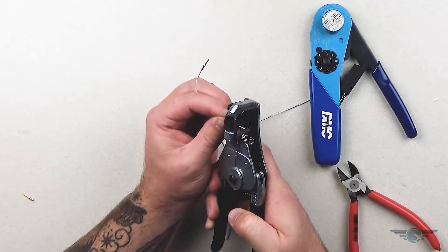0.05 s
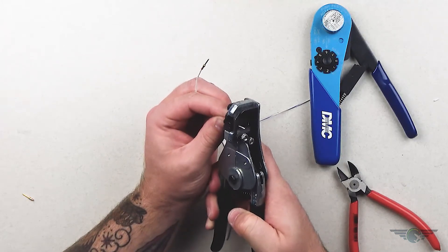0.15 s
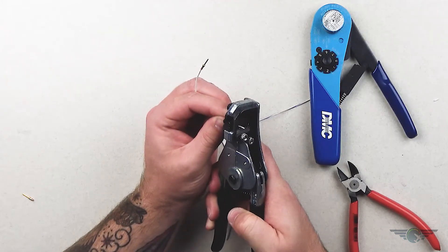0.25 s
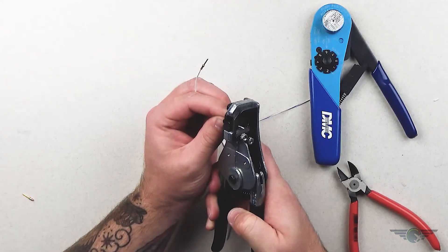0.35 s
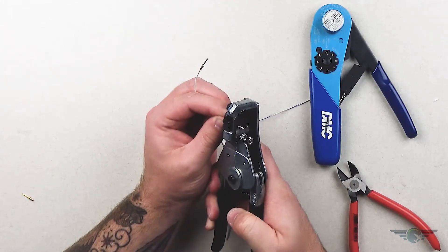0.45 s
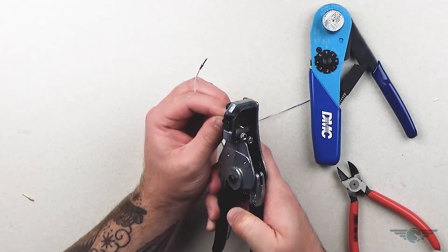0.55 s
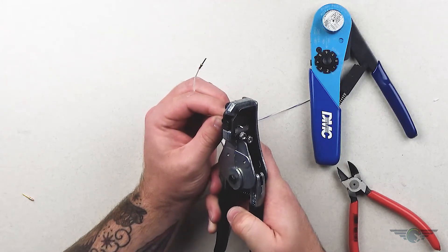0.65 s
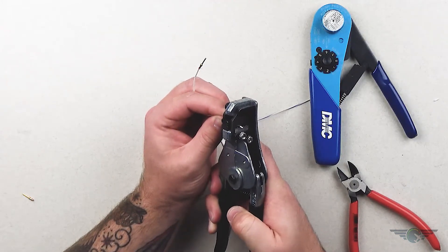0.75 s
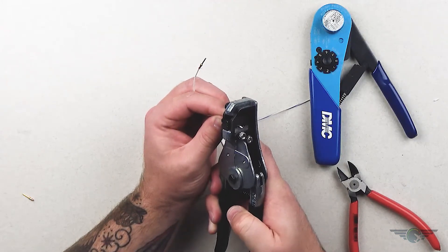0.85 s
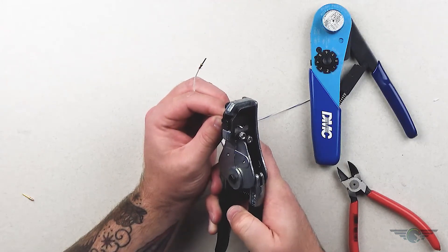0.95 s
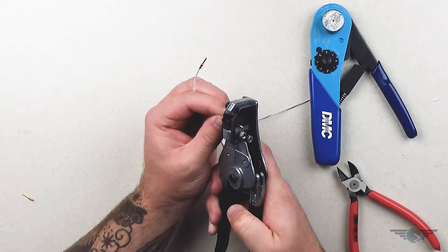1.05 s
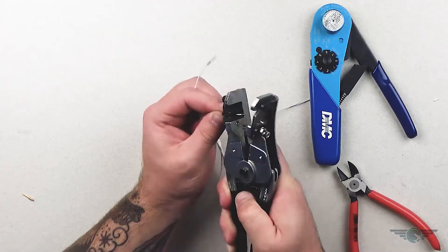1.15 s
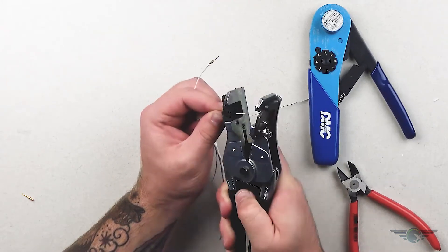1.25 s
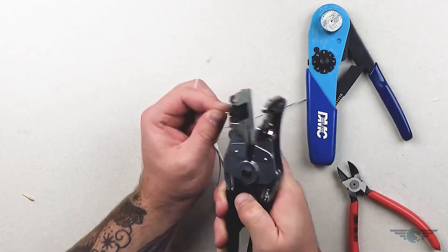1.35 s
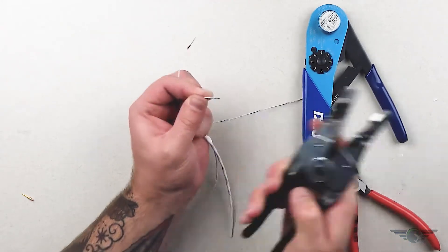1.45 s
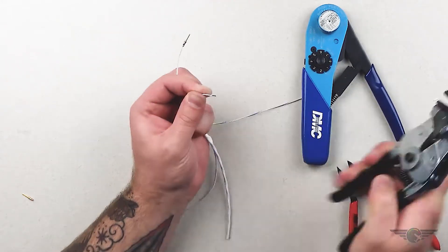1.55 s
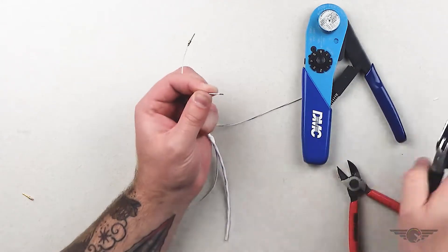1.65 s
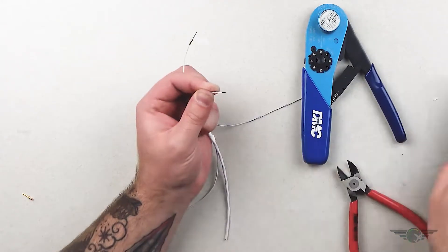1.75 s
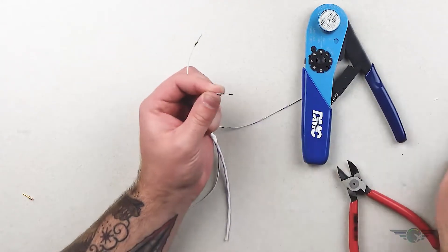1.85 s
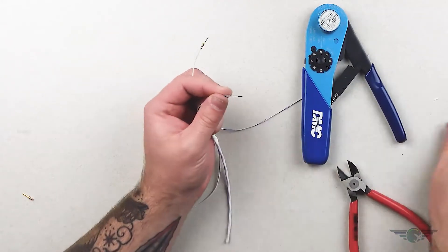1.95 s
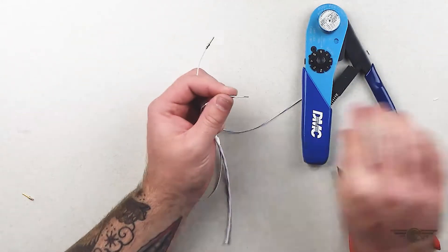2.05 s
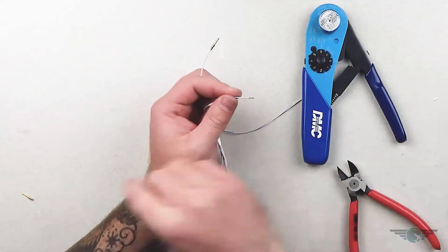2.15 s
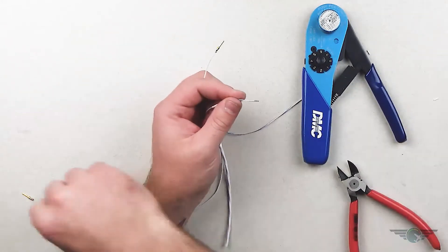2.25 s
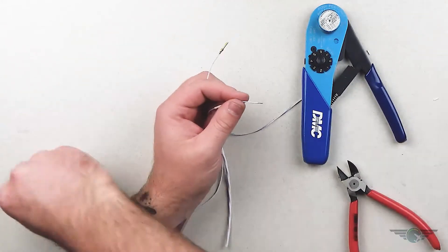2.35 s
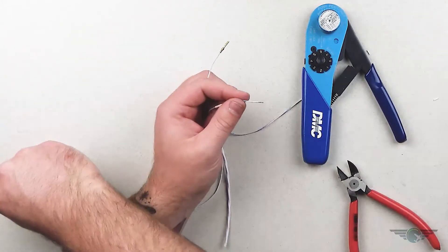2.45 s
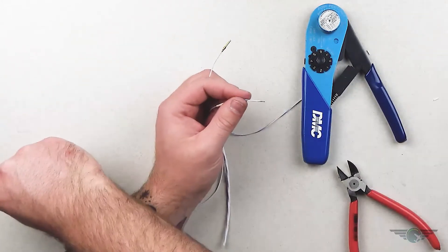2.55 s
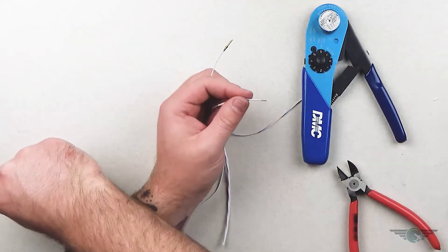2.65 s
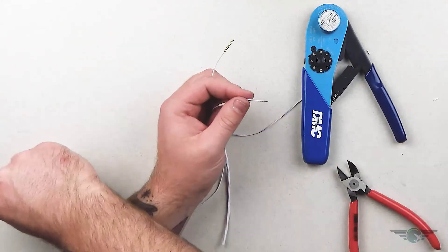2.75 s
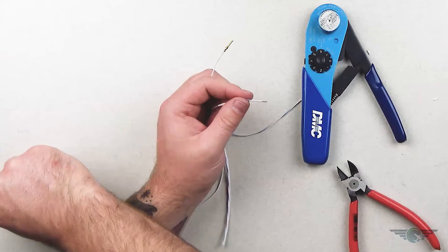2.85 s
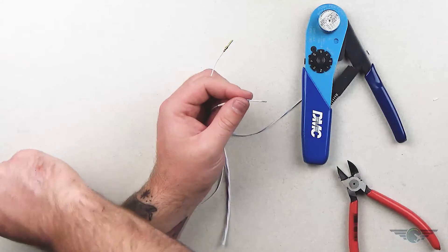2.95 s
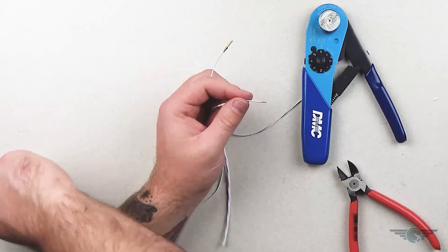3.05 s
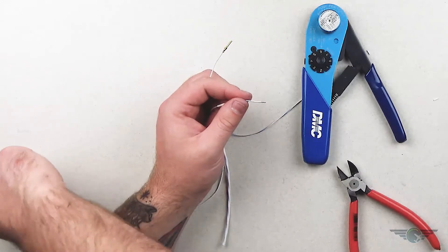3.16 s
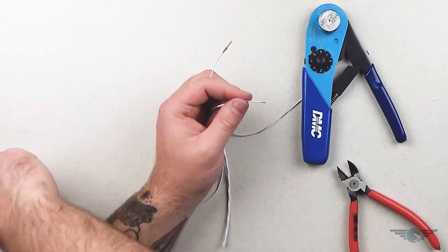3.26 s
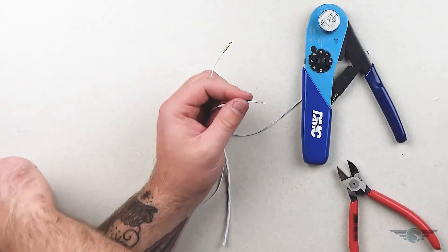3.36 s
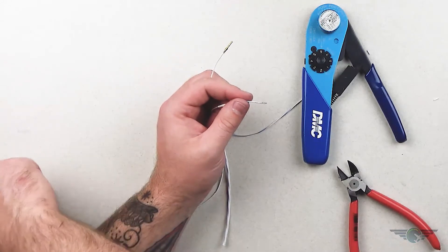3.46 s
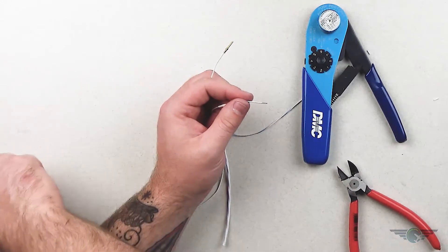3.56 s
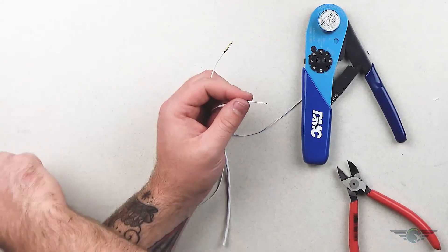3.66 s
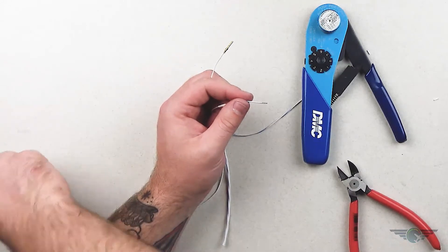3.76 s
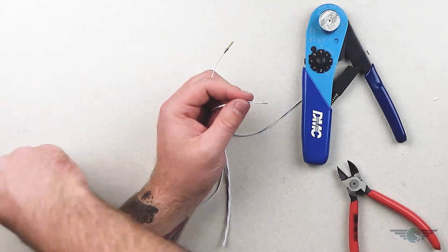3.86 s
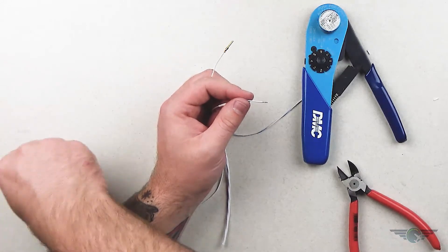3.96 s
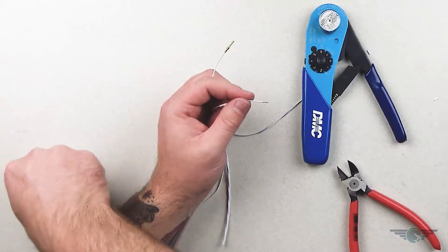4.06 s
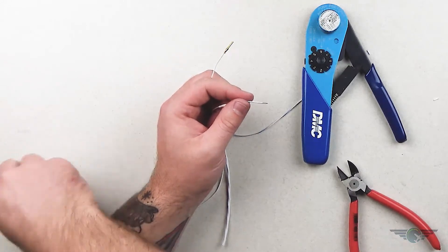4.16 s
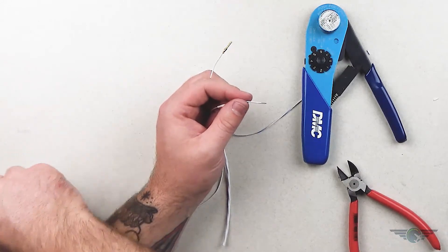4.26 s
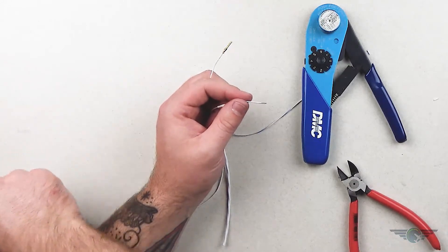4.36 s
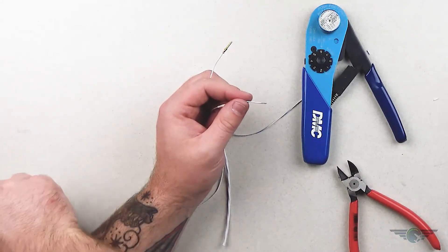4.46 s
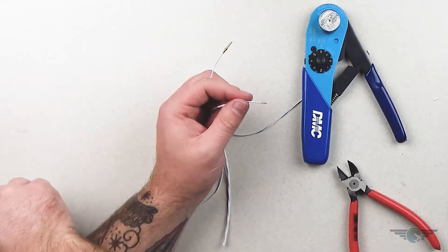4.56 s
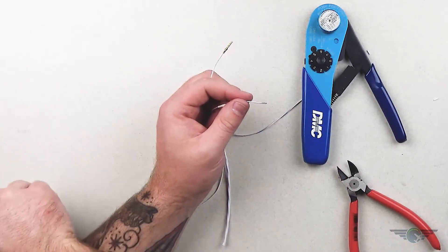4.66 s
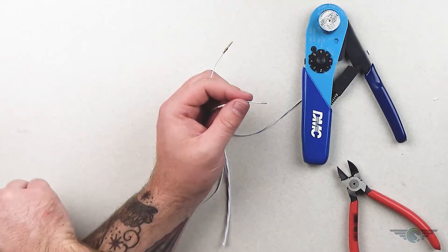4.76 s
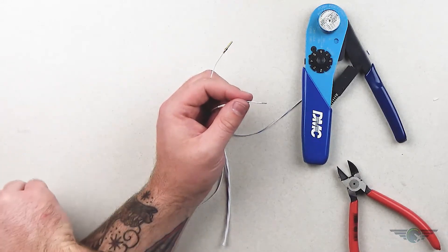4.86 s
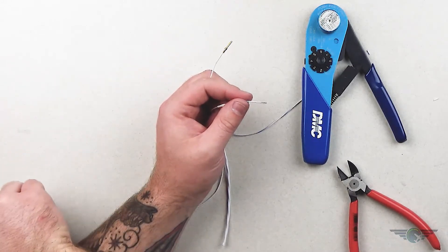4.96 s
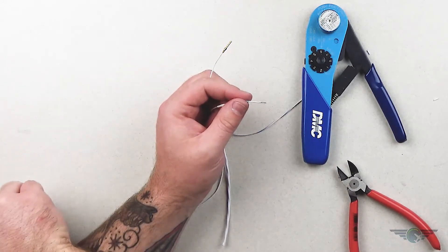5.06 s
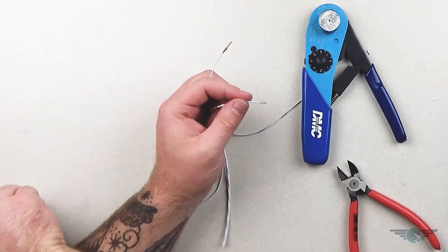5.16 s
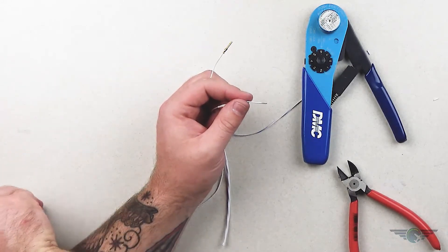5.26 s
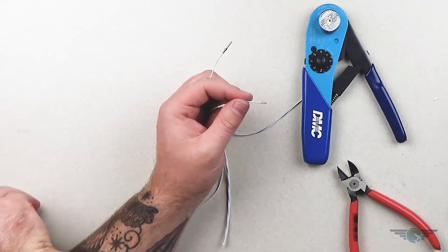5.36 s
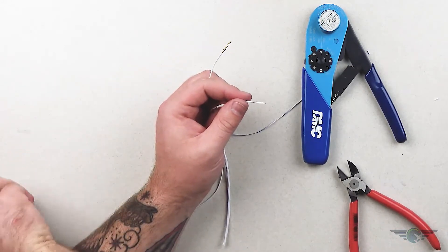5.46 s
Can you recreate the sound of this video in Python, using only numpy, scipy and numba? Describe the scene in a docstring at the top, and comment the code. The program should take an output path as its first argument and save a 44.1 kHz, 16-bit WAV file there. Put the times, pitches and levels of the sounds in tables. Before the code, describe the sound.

A steady low electrical hum fills a small indoor workspace. After a quiet first second, hand-tool jaws click irregularly on thin wire and snap back brightly. The tool lands hard on the bench, rocks once and rings on. Quiet follows: the hum slowly swells under a soft skin rustle and a few small ticks. Close, dry pickup with a short room tail.

```python
"""In a small room with mains hum that slowly grows, a hand wire stripper works close to the microphone.
Its jaws click on a thin wire in damped noise and steel modes, then the spring snaps them against their stop.
The tool is put down on a bench: thuds and clacks chatter, bench modes sound and its steel frame rings on.
A hand brushes over the bench in grainy noise and small parts tick. Diffuse noise makes the room's tail,
and the recorder's limiter ducks everything around and just after the loudest blows."""
import sys
import numpy as np
from scipy import signal
from scipy.fft import rfft, irfft
from scipy.io import wavfile
from scipy.ndimage import uniform_filter1d, minimum_filter1d
from numba import njit

SR = 44100
rng = np.random.default_rng(int(sys.argv[2]) if len(sys.argv) > 2 else 0)


def generate_wav(signal):
    """Clip the signal to [-1, 1] and save it as 16-bit WAV at the path in sys.argv[1]."""
    frames = np.transpose(np.atleast_2d(signal))
    scaled = np.clip(frames, -1, 1) * 32767
    pcm = np.round(scaled).astype(np.int16)
    wavfile.write(sys.argv[1], SR, pcm)


N = 243431
TIME = np.arange(N) / SR


def amp(db):
    """Decibels to amplitude."""
    return 10 ** (np.asarray(db) / 20)


def unit(x):
    """Scale to rms 1."""
    return x / np.sqrt(np.mean(x ** 2))


def fade(t60, size):
    """Exponential decay, falling 60 dB in t60 seconds."""
    return np.exp(-np.log(1000) * TIME[:size] / max(t60, 1e-3))


def walk(rate):
    """Slow random wander with a spread near 1, drawing new values at this rate in Hz."""
    k = int(SR / rate)
    steps = np.repeat(rng.standard_normal(N // k + 1), k)
    return unit(uniform_filter1d(uniform_filter1d(steps, k), k))[:N]


def add(track, s, sound):
    """Mix a sound into the track at time s."""
    i = int(s * SR)
    track[i:i + len(sound)] += sound[:N - i]


def spectrum(colour, size, tilt_db=0, peak_hz=1, peak_db=0, peak_width=0.053):
    """Gain at each frequency: a colour, a tilt per octave and one resonance (width relative to its pitch)."""
    f = np.maximum(np.fft.rfftfreq(size, 1 / SR), 1)
    hz, db = np.transpose(colour)
    shape = np.interp(np.log(f), np.log(hz), db)
    tilt = tilt_db * np.log2(np.maximum(f, hz[0]))
    peak = peak_db / (1 + ((f / peak_hz - 1) / peak_width) ** 2)
    return amp(shape + tilt + peak)


def noise(colour, tilt_db=0):
    """Coloured noise of rms 1."""
    return unit(irfft(spectrum(colour, N, tilt_db) * rfft(rng.standard_normal(N)), N))


def ring(modes, size, scatter_db=2):
    """Decaying modes; each blow lands elsewhere and shares its energy differently."""
    out = np.zeros(size)
    for hz, db, t60 in modes:
        level = amp(db + scatter_db * rng.standard_normal())
        sign = np.sign(rng.standard_normal())
        out += level * sign * fade(t60, size) * np.sin(2 * np.pi * hz * TIME[:size])
    return out


def crack(gains, t60, size):
    """A blow into dense, quickly damped modes: random phases, but an even spectrum; starts at rms 1."""
    decay = fade(t60, size)
    x = rng.standard_normal(size) * decay
    for _ in range(6):  # alternately impose the spectrum and the decay
        phases = np.exp(1j * np.angle(rfft(x)))
        x = irfft(gains * phases, size) * decay ** .05
    x = x * decay ** .1
    return x * np.linalg.norm(decay) / np.linalg.norm(x)


def room(x, wet_db, t60_low, t60_high):
    """Diffuse tail of a small room; the treble dies first."""
    size, tail = SR, 0
    f = np.fft.rfftfreq(size, 1 / SR)
    centres = np.geomspace(250, 16000, 7)
    white = rfft(rng.standard_normal(size))
    for share, t60 in zip(np.eye(len(centres)), np.linspace(t60_low, t60_high, len(centres))):
        band = irfft(white * np.interp(f, centres, share), size)
        tail = tail + band * fade(t60, size)
    tail *= np.clip(TIME[:size] / 0.0028, 0, 1) ** 2  # first reflections take a few ms to arrive
    return amp(wet_db) * signal.fftconvolve(x, tail / np.linalg.norm(tail))[:N]


MAINS_HZ = 60
# the background creeps up steadily and steps back once, as the tool lands
BACKGROUND_START_DB, CREEP_DB_PER_S, STEP_BACK_DB = -3, 1.5, -3.5
# mains hum, rms before the swell: mains_multiple, level_db
HUM = [(1, -27), (2, -51), (3, -40.5), (5, -51), (7, -56), (9, -58.5), (11, -63), (13, -66.5), (15, -73)]
# a fan motor's tones, rms before the swell: pitch_hz, level_db
FAN = [(113.3, -44), (284, -55.5), (511, -59.5), (566, -58.5)]
# colour of the mains buzz: pitch_hz, relative_level_db
BUZZ_COLOUR = [(200, -10), (450, 0), (800, -6), (1400, -13.5), (2800, -20), (3500, -18.5), (4400, -25),
               (5500, -27), (7500, -34), (16000, -44)]
# colour of the low rumble, also felt in the squeeze: pitch_hz, relative_level_db
RUMBLE_COLOUR = [(15, -2.5), (29, 10), (42, -2), (75, -3.5), (95, -4), (125, 7), (155, -2), (200, -3.5),
                 (260, -10), (500, -49.5)]
# colour of the room's hiss: pitch_hz, relative_level_db
ROOM_TONE = [(12, -41), (20, 8.5), (44, -17.5), (70, 8), (88, 0.5), (107, -52.5), (187, -13), (234, -22),
             (293, -10.5), (347, -11), (542, -17.5), (718, -27.5), (1710, -36.5), (14700, -88.5),
             (16000, -74.5)]


def background():
    """Mains hum with a buzz on every half cycle, a fan, low rumble and hiss."""
    phase = 2 * np.pi * MAINS_HZ * TIME
    hum = sum(amp(db + .5 * walk(6.4)) * np.cos(k * phase) for k, db in HUM)
    fan = 0
    for hz, db in FAN:
        wandering_phase = 2 * np.pi * hz * TIME + .5 * walk(3.82)
        fan = fan + amp(db + 2 * walk(5.53)) * np.sin(wandering_phase)
    half_cycles = unit(amp(4 * np.cos(2 * phase)))
    buzz = amp(-52.5) * noise(BUZZ_COLOUR) * half_cycles
    air = amp(-38.5) * noise(RUMBLE_COLOUR) + amp(-43.5) * noise(ROOM_TONE)
    landed = np.interp(TIME, [LANDING[0][0], LANDING[-1][0]], [0, 1])
    swell_db = BACKGROUND_START_DB + CREEP_DB_PER_S * TIME + STEP_BACK_DB * landed
    tones = np.sqrt(2) * (hum + fan)  # peak amplitude from rms
    return amp(swell_db) * (tones + buzz) + amp(1.2 * swell_db) * air


STROKE_POWER = .9  # the amplitude of a rub grows with this power of its speed


def strokes(rows):
    """Each movement speeds up and slows to rest; its level follows the speed."""
    out = np.zeros(N)
    for s, length, db in rows:
        along = np.clip((TIME - s) / length, 0, 1)
        speed = 4 * along * (1 - along)
        out += amp(db) * speed ** STROKE_POWER
    return out


def rubbing(colour, rows, grain_db):
    """Sliding surfaces catch and slip in tiny irregular grains."""
    grains = unit(amp(grain_db * (walk(420) + .5 * walk(49))))
    return noise(colour) * grains * strokes(rows)


# colour of skin on the bench: pitch_hz, relative_level_db
HAND_COLOUR = [(500, -13.5), (1500, -5), (3200, 4), (4200, -1), (5300, 0.5), (6800, -4.5), (8000, 0),
               (10500, -8.5), (15500, -17.5), (18000, -35)]
# strokes of a hand over the bench: start_s, length_s, peak_level_db
HAND_STROKES = [(3.81, 0.076, -56), (3.874, 0.086, -57), (3.939, .105, -55), (4.044, .09, -58.5)]


def hand_brushing():
    """A hand brushes over the bench, its skin catching in faint grains."""
    return rubbing(HAND_COLOUR, HAND_STROKES, grain_db=0.5)


# colour of a hard contact: pitch_hz, relative_level_db
CLICK_COLOUR = [(200, -17), (900, -5.5), (1800, -7.5), (3100, 1), (4200, -1.5), (5800, -1), (8000, -5),
                (12000, -4.5), (15500, -12.5), (18000, -35.5)]


def click(s, db, hz, height_db, tilt_db, t60):
    """One hard contact with its own resonance."""
    out, size = np.zeros(N), 2 ** 13
    gains = spectrum(CLICK_COLOUR, size, tilt_db, hz, height_db)
    add(out, s, amp(db) * crack(gains, t60, size))
    return out


TICK_T60_S = 0.036
# wire and small parts on the bench: start_s, level_db, resonance_hz, resonance_height_db, tilt_db_per_octave
TICKS = [(.068, -53, 3550, 5, -3), (.1048, -34.5, 5100, 18, 3.5), (1.464, -33.5, 1000, 23, -7),
         (2.8338, -50.5, 9500, 7.5, 2), (3.8172, -54, 6570, 20, 1.5), (3.8344, -45.5, 3130, 1, -1.5),
         (4.592, -62, 13070, 0, 15), (5.407, -36, 3230, 6, -8.5), (5.4128, -32, 9300, 17.5, 6),
         (5.416, -38, 4500, 5, -9)]


def ticks():
    """Wire and small parts tick against the bench."""
    return sum(click(*row, TICK_T60_S) for row in TICKS)


# the squeeze of the handles: start_s, length_s, peak_level_db
SQUEEZE = [(1.09, 0.2, -32.5)]


def squeeze_rumble():
    """The squeeze of the handles rumbles through the bench as low noise."""
    return noise(RUMBLE_COLOUR, tilt_db=-4) * strokes(SQUEEZE)


# wire and steel sliding in the hand, then the tool skidding to rest: start_s, length_s, peak_level_db
TOOL_SLIDES = [(1.135, 0.072, -47), (1.385, 0.041, -45), (1.502, 0.041, -45.5), (1.538, 0.068, -45.5),
               (1.595, .08, -45.5), (1.965, 0.059, -45)]


def tool_sliding():
    """Wire and steel slide in the hand and the tool skids to rest, in coarse grains."""
    return rubbing(CLICK_COLOUR, TOOL_SLIDES, grain_db=4.5)


# long ring of the tool's frame and spring: pitch_hz, relative_level_db, t60_s
FRAME_MODES = [(1410, -5, 1.1), (2541, -14.5, 2.6), (2988, -19, 1.3), (3596, -3.5, 1.5), (3741, -17, 1.2),
               (4064, -1.5, .8), (4527, -7.5, .9), (4705, -15, .85), (4780, -14, .7), (4960, 0, .3),
               (5140, 3, .33), (5216, -12, .95), (5650, -3, .25), (6730, 1, .22)]


def frame_ring():
    """The steel frame rings freely once it has landed and the hand lets go."""
    out = np.zeros(N)
    add(out, LANDING[0][0], amp(-38) * ring(FRAME_MODES, 2 * SR, scatter_db=0.5))
    return out


# time between a blow's contacts, and what thud and clack change by at each
CHATTER_S, CHATTER_THUD_DB, CHATTER_CLACK_DB = .003, -2, -5
# the tool lands and rocks on the bench: start_s, thud_level_db, clack_level_db
LANDING = [(1.895, 6.5, 2.5), (1.9687, -0.5, -11), (1.985, -10, -16), (2.003, -21.5, -32),
           (2.026, -21.5, -40)]
# bench top: pitch_hz, relative_level_db, t60_s
BENCH_MODES = [(379, 2.5, .33), (512, -7, .4), (624, -12, .35), (652, -10, .3), (868, -1, .35),
               (902, -3, .25), (935, -2, .3), (1189, -4, .3), (1232, -2, .3), (1266, -3, .28),
               (1362, 2, .38), (1421, -1, .38), (1466, -4, .3), (1554, -5, .37), (1793, -13, .35)]
# colour of a thud in the bench top: pitch_hz, relative_level_db
THUD_COLOUR = [(90, -37.5), (220, -7.5), (370, -5), (700, -3), (920, -3), (1080, -1.5), (1400, 4),
               (1900, -9), (2300, -9.5), (2650, -9.5), (3600, -8), (4400, -22), (5200, -15.5), (7500, -40),
               (16000, -25.5)]


def landing(count=3):
    """Each blow chatters a few times, thudding in the bench top and clacking the loose jaws."""
    out, size = np.zeros(N), 2 ** 15
    thud_gains = spectrum(THUD_COLOUR, size)
    clack_gains = spectrum(CLICK_COLOUR, size, tilt_db=-3.5)
    for s, thud_db, clack_db in LANDING:
        add(out, s, amp(thud_db - 27.0) * ring(BENCH_MODES, size))
        for k in range(count):
            thud = amp(thud_db + k * CHATTER_THUD_DB) * crack(thud_gains, t60=0.0334, size=size)
            clack = amp(clack_db + k * CHATTER_CLACK_DB) * crack(clack_gains, t60=0.018, size=size)
            add(out, s + k * CHATTER_S, thud + clack)
    return out


SNAP_HEIGHT_DB, SNAP_TILT_DB = 6, 3.5  # height of each blow's resonance; tilt per octave
# the spring throws the jaws back against their stop: start_s, level_db, resonance_hz, t60_s
SNAP = [(1.6728, -17.5, 10200, 0.067), (1.6776, -6, 11800, 0.025), (1.6839, 10, 5940, 0.029)]


def snap():
    """The sprung jaws hit their stop in a quick, growing run of blows."""
    return sum(click(s, db, hz, SNAP_HEIGHT_DB, SNAP_TILT_DB, t60) for s, db, hz, t60 in SNAP)


# steel jaws, damped by the hand: pitch_hz, relative_level_db, t60_s
JAW_MODES = [(3200, 0, .05), (3630, -5, .05), (5050, -1, .06), (5900, -3, .05), (6680, -4, .07),
             (7520, -4, .05), (9250, 0, .04), (10700, -1, .035), (12400, -1, .035)]


def jaw_ring():
    """Every click sets the jaws ringing briefly, in a different mix of their modes."""
    out = np.zeros(N)
    for s, db, *_ in CLICKS:
        add(out, s, amp(db - 20) * ring(JAW_MODES, SR // 4, scatter_db=3))
    return out


CLICK_T60_S = 0.029
# a harder click is brighter: flat at this level, tilted by so many dB per octave for each dB above it
CLICK_FLAT_DB, CLICK_TILT_PER_DB = -27.5, 0.5
# light clicks of the jaws on the wire: start_s, level_db, resonance_hz, resonance_height_db
CLICKS = [(1.124, -41.5, 4720, 13.5), (1.1504, -40, 8660, 25), (1.1582, -36, 10000, 8),
          (1.183, -35.5, 3400, 8), (1.2102, -13, 6300, 4.5), (1.2875, -38, 6640, 11),
          (1.3451, -41, 3280, 7.5), (1.3842, -21, 9500, 5), (1.436, -33.5, 5500, 5),
          (1.551, -35.5, 5870, 16.5), (1.566, -30, 6750, 17), (1.5743, -28, 5350, 10.5),
          (1.607, -20, 3270, 12), (1.64, -37, 9300, 19), (1.646, -33, 4790, 7.5)]


def jaw_clicks():
    """The jaws catch and release the wire; the harder the contact, the brighter."""
    out = np.zeros(N)
    for s, db, hz, height_db in CLICKS:
        tilt_db = CLICK_TILT_PER_DB * (db - CLICK_FLAT_DB)
        out += click(s, db, hz, height_db, tilt_db, CLICK_T60_S)
    return out


def scene():
    """Tool and hands close to the microphone; clicks, slides and blows also reach it by way of the room."""
    light = jaw_clicks() + jaw_ring() + ticks()
    sliding = tool_sliding() + hand_brushing()
    blows = snap() + landing()
    close = light + sliding + blows
    walls = room(close, wet_db=-18.0, t60_low=0.74, t60_high=0.26)
    return (background() + walls + squeeze_rumble() + frame_ring() + close)[None]


@njit
def peak_follow(x, release):
    """Jumps to each peak and sinks back exponentially."""
    out, e = np.empty(len(x)), 0.
    for i in range(len(x)):
        e = max(x[i], e * release)
        out[i] = e
    return out


CEILING, TOP_HZ = .51, 15800  # limiter threshold as an amplitude; upper edge of the recorder's band


def record(dry, release_s=0.016):
    """A look-ahead limiter ducks around and after the loudest peaks; the top is cut."""
    ahead, hold = SR // 1000, SR // 100  # samples in 1 ms and 10 ms
    held = -minimum_filter1d(-np.abs(dry[0]), hold, origin=(hold - 1) // 2)
    peaks = peak_follow(held, np.exp(-1 / (release_s * SR)))
    needed_gain = CEILING / np.maximum(peaks, CEILING)
    gain = uniform_filter1d(minimum_filter1d(needed_gain, ahead), ahead)
    top_cut = signal.ellip(10, .2, 70, TOP_HZ, fs=SR, output="sos")
    return signal.sosfilt(top_cut, dry * gain)


dry = scene()
out = record(dry)
generate_wav(out)
```